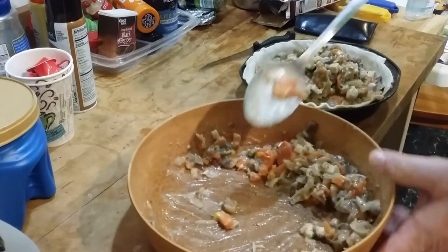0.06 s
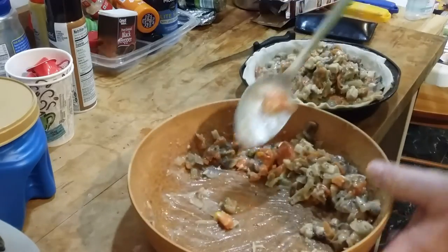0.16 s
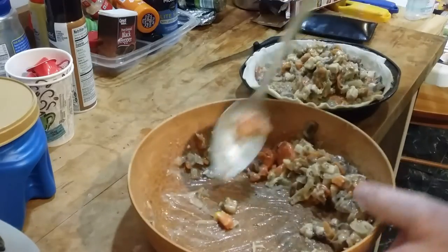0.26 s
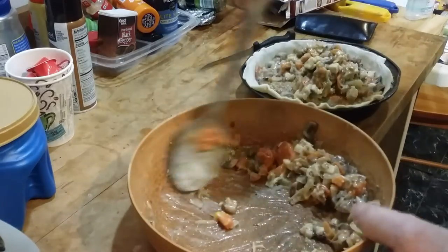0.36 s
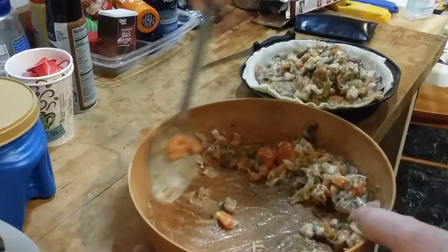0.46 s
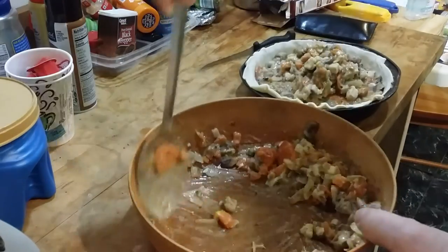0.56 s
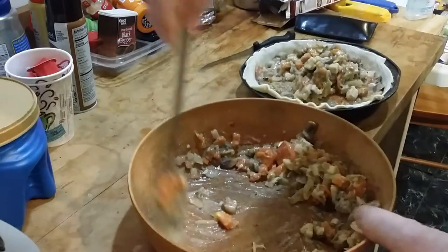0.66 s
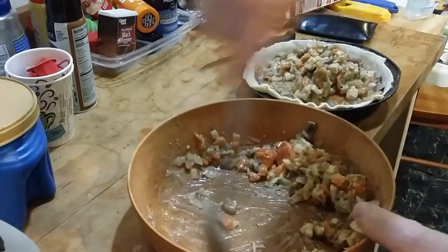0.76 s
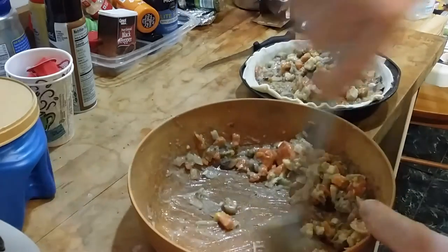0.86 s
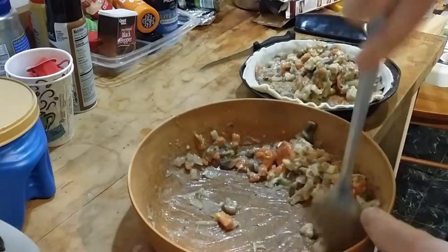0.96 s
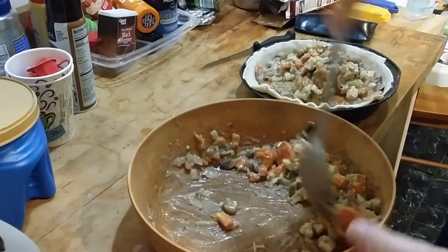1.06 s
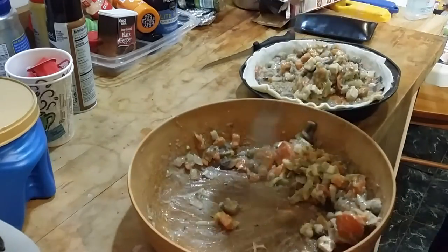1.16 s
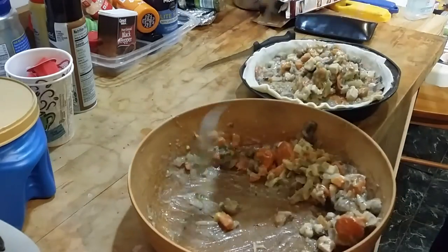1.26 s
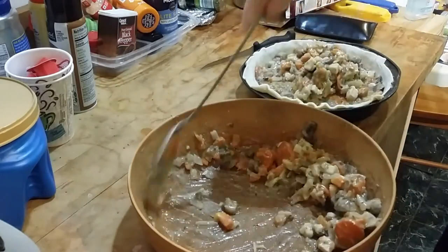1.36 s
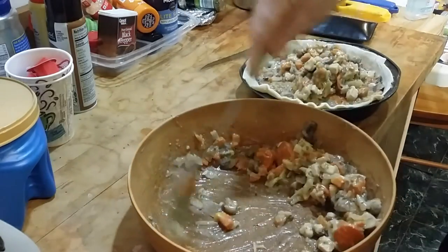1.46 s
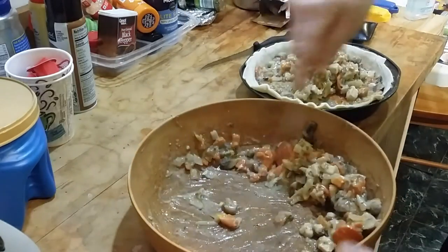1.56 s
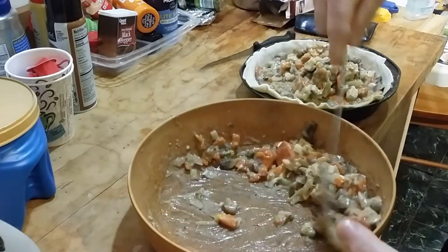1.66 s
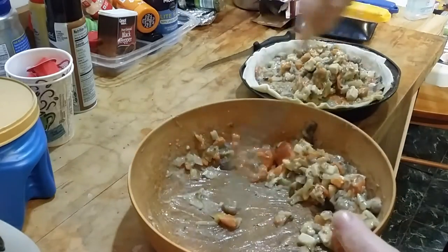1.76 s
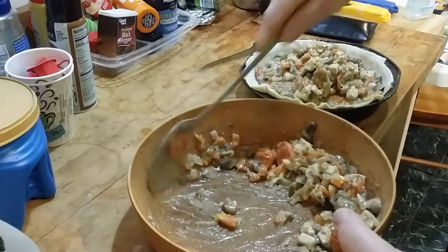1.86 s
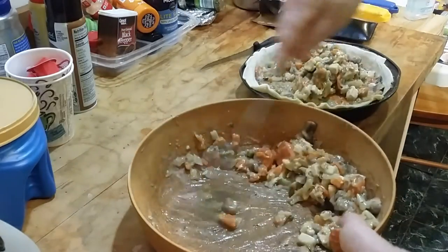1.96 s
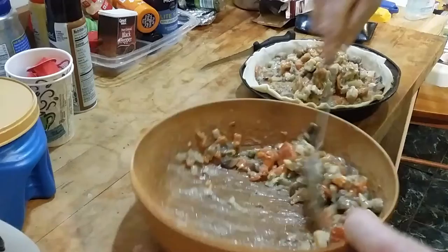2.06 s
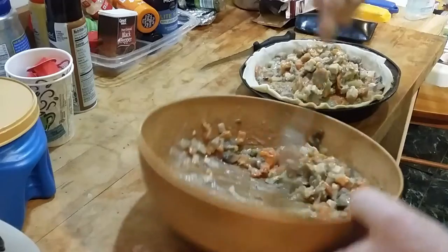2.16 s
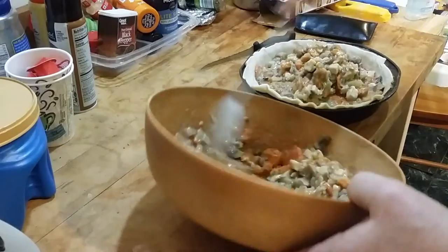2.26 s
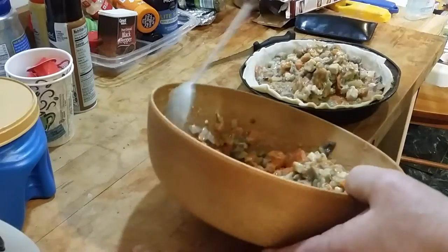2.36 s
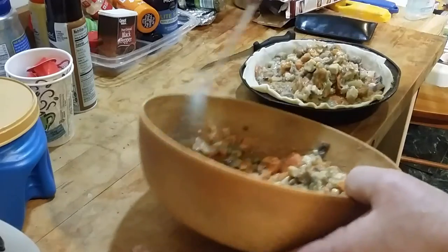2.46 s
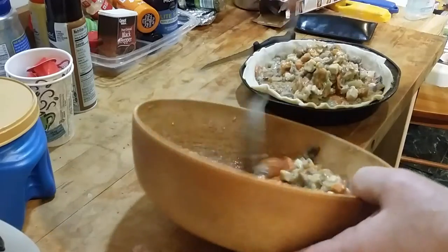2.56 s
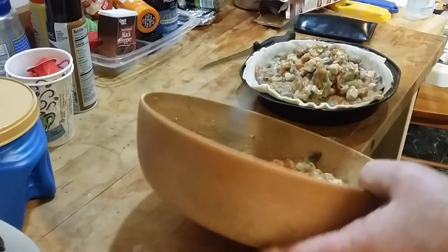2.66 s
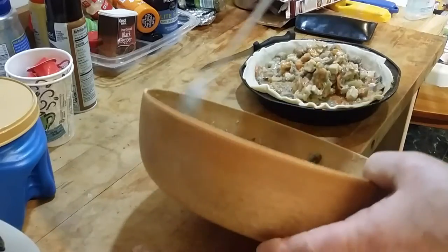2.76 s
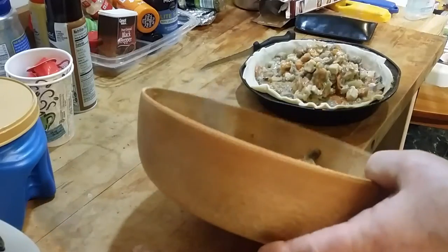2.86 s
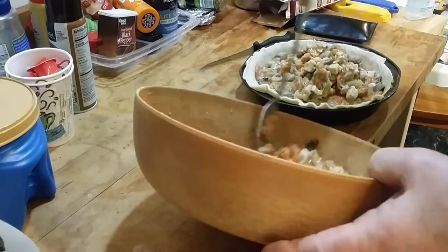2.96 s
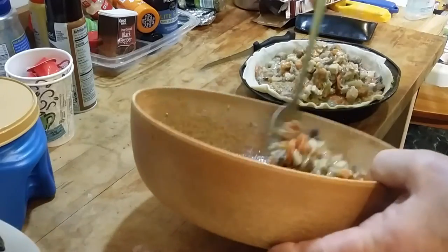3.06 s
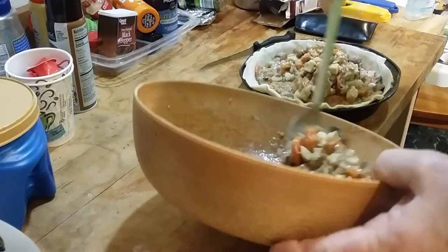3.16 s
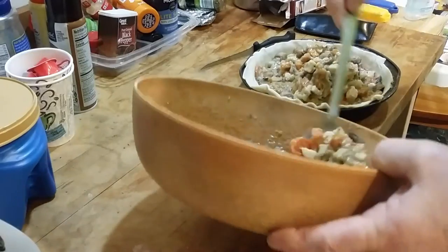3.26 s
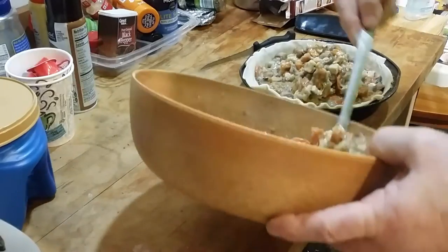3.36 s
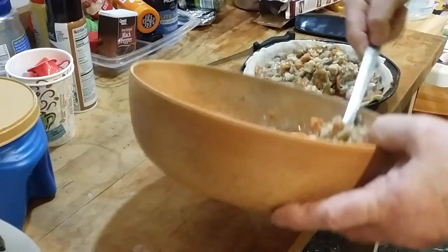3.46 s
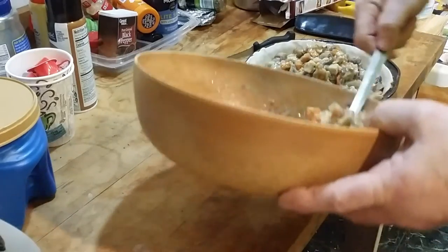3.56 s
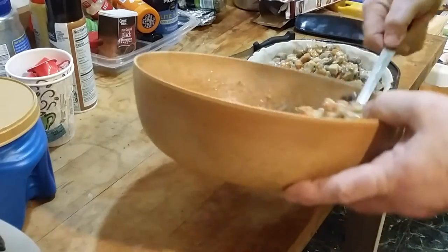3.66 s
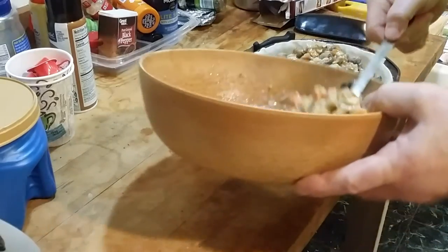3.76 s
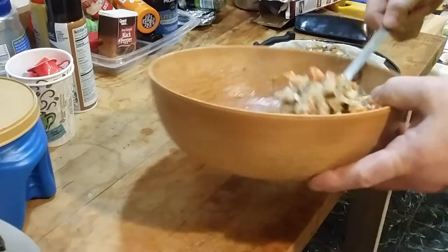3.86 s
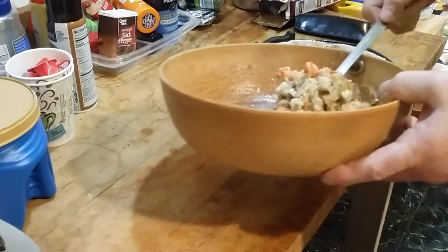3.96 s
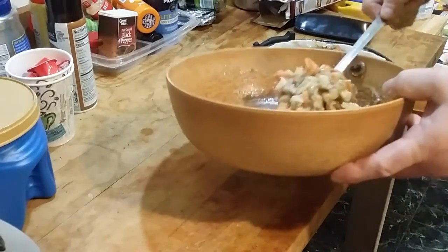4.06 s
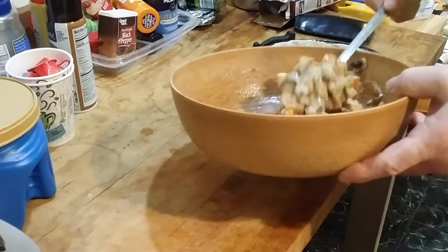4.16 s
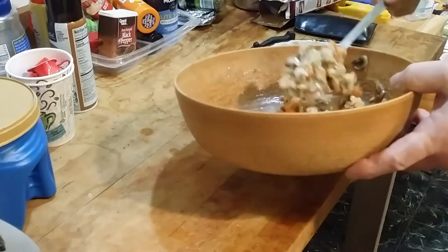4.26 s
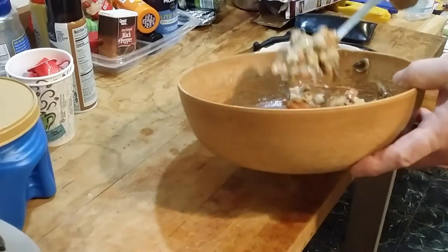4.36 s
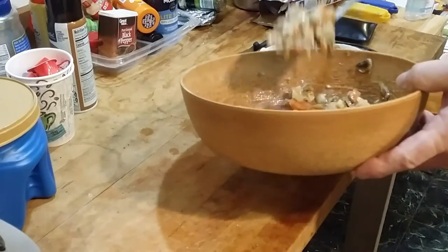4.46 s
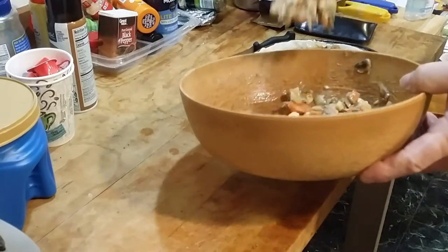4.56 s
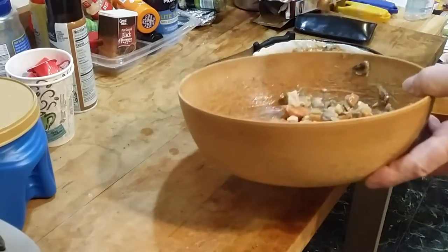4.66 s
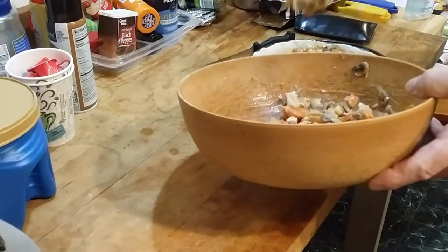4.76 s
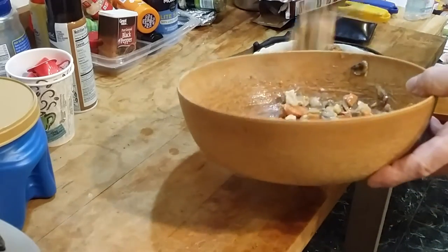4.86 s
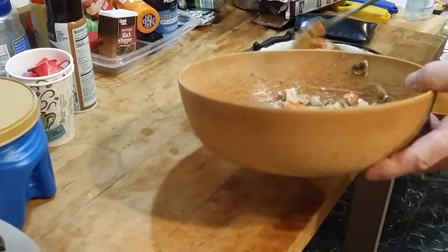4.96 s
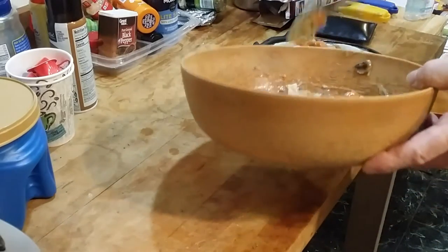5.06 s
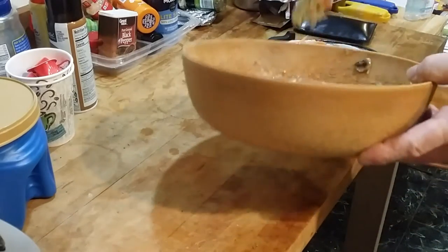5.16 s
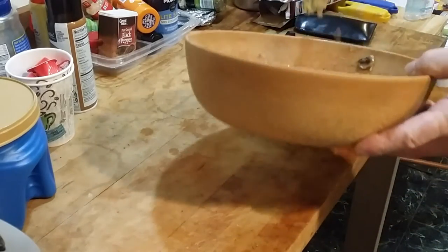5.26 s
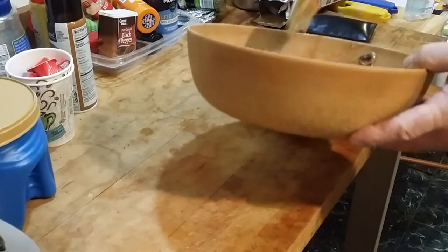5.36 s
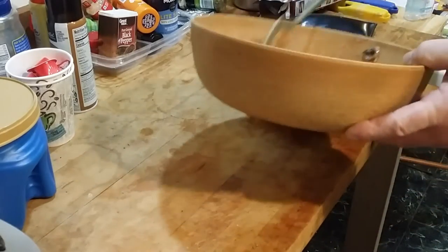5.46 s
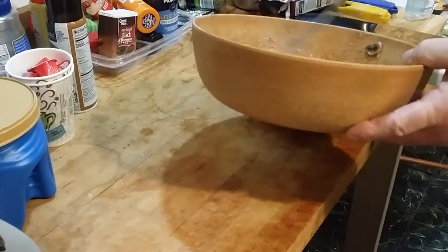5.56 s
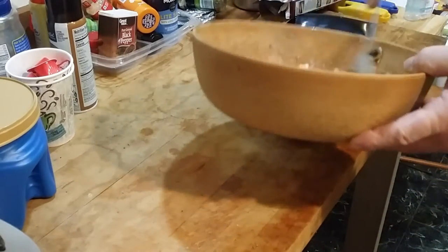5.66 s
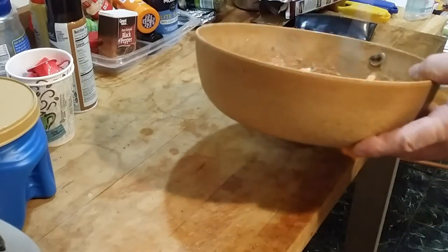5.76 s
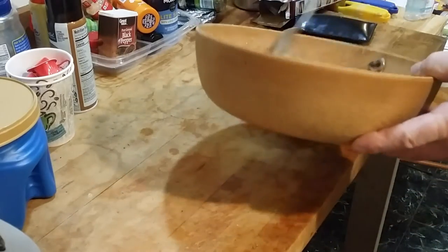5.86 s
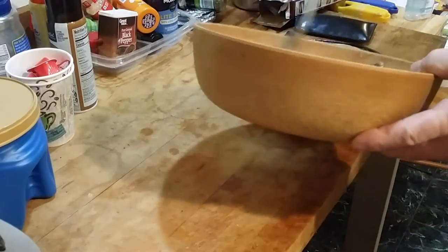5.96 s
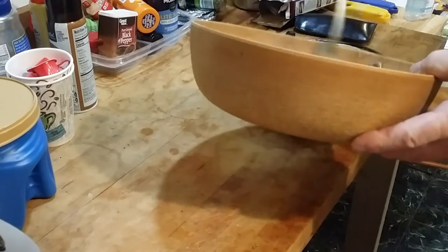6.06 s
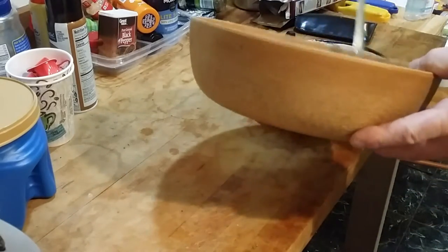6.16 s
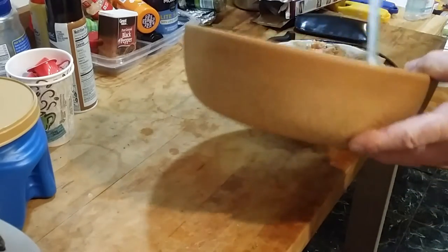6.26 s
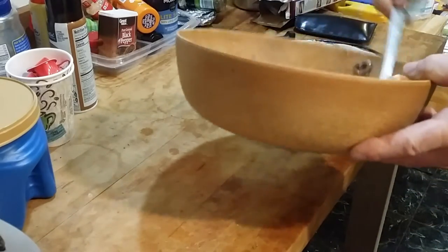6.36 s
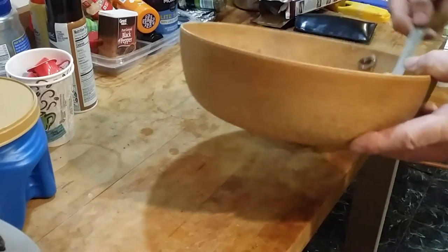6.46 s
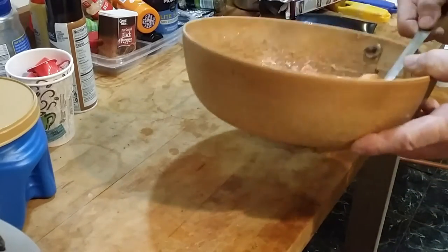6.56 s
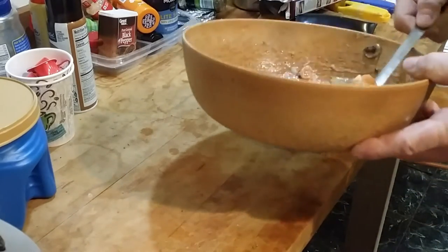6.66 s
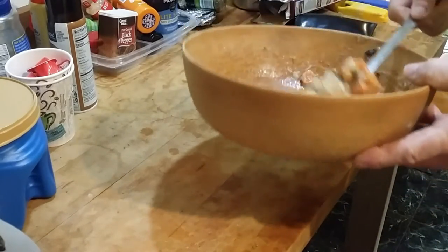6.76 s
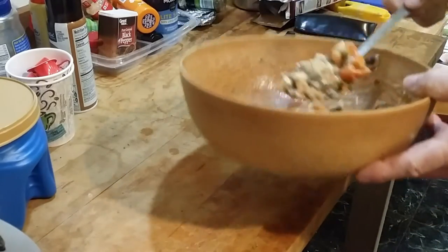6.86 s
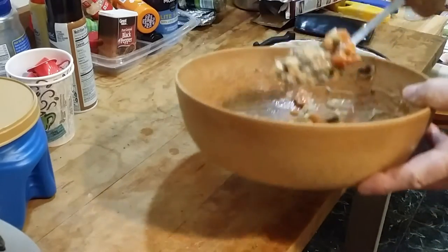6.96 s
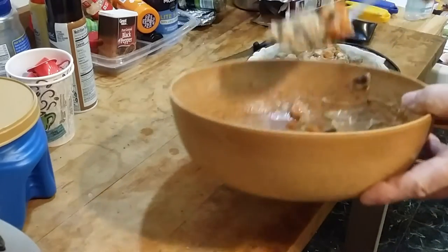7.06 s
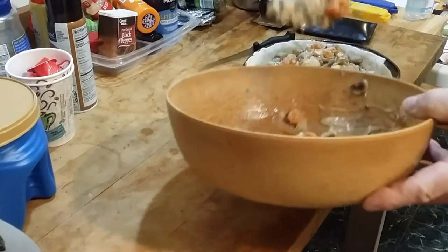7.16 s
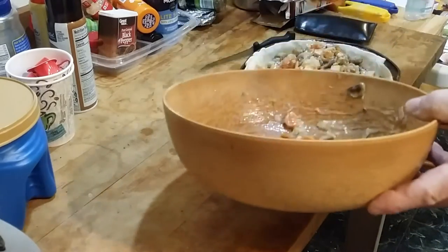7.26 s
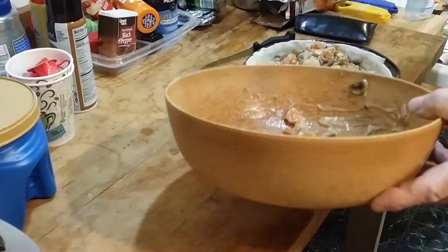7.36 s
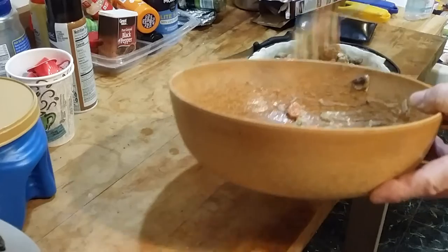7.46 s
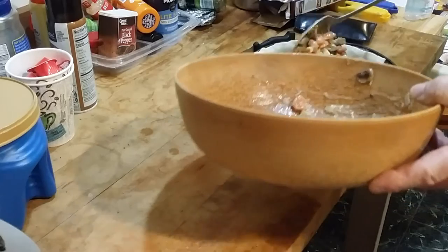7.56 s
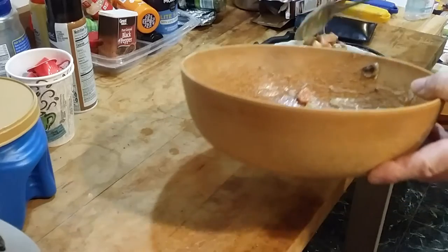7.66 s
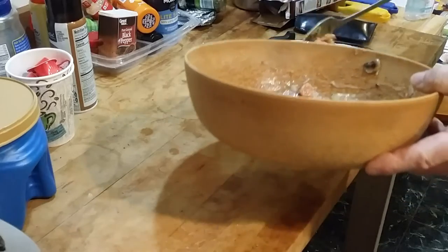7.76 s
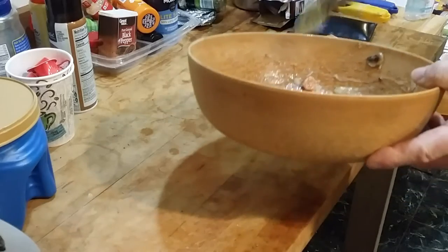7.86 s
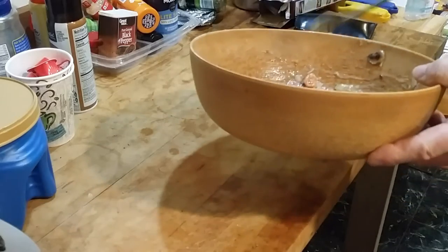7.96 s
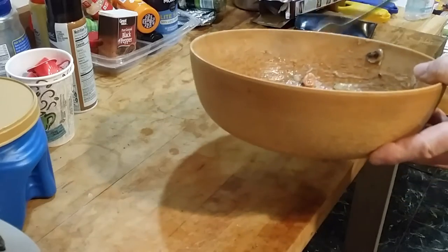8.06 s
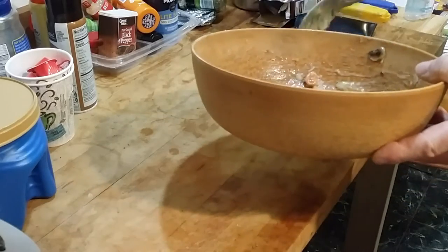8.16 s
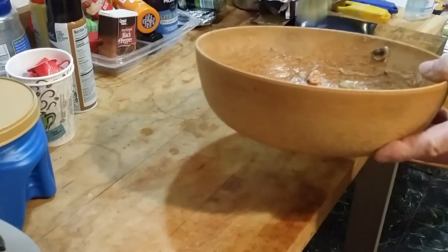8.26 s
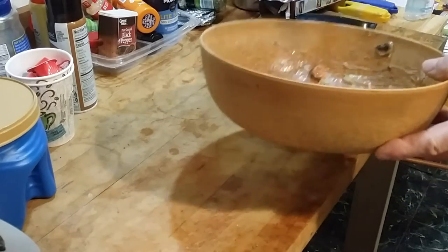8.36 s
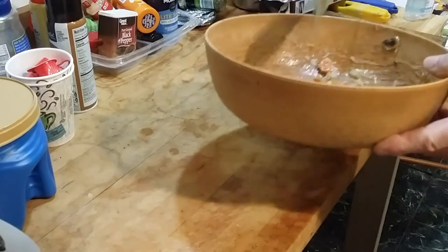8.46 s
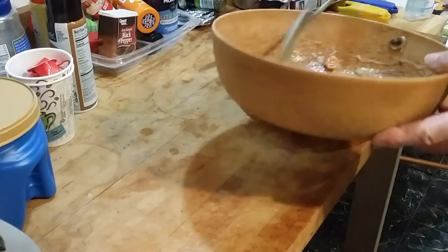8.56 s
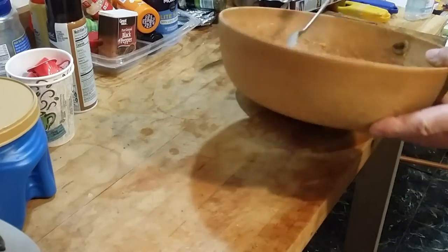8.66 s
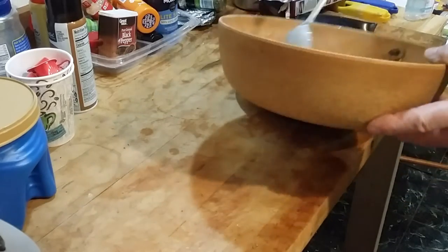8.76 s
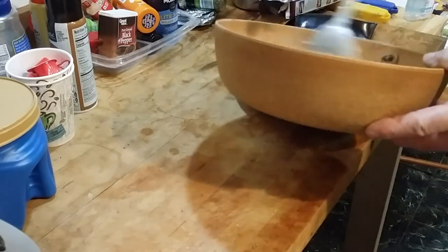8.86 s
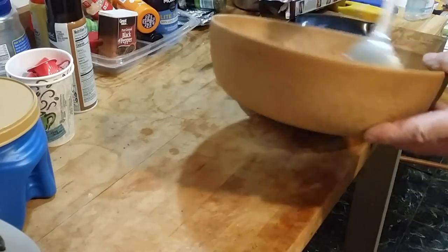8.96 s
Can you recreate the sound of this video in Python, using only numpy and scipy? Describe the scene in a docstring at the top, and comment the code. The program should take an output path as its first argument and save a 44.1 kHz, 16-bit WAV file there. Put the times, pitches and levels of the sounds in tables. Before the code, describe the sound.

A metal spoon knocks and scrapes along a wooden bowl in bursts, with wet filling ticking and smacking as it drops into a dish nearby.

```python
"""A metal spoon knocks on and scrapes along a wooden bowl held in one hand, close to the microphone: uneven
grains and sharp cracks drive banks of resonances, the bright ones near 7 kHz being the microphone's own.
Brief narrow rings of noise lie within the scrape and knocks, and the bowl hums under slow strokes. Filtered
noise puffs make the wet filling tick and smack as it is lifted and dropped into a dish. Low modes boom when
the bowl bumps the counter. A small kitchen adds a dense tail; appliance hum and air noise behind sink while
the spoon is busy and swell again in the pauses."""
import sys
import numpy as np
from scipy import signal
from scipy.fft import rfft, irfft
from scipy.io import wavfile
from scipy.ndimage import uniform_filter1d

SR = 44100
rng = np.random.default_rng(int(sys.argv[2]) if len(sys.argv) > 2 else 0)


def inscribe(sig):
    """Save sig as 16-bit PCM at rate SR to the path in sys.argv[1].

    A 1-D sig is mono; a 2-D sig holds one channel per row.
    Samples are clipped to [-1, 1] before scaling.
    """
    pcm = np.round(np.clip(np.atleast_2d(sig).T, -1, 1) * 32767)
    wavfile.write(sys.argv[1], SR, pcm.astype(np.int16))


N = 397341   # length in samples, about 9 s

# Strokes of the spoon, each a list of pushes; the stroke lands where its first push starts. Columns:
# start_s, length_s, edge_db, change_db (over the push), wall_db and body_db (against the edge),
# wall_hz and body_hz (favoured pitches)
SPOON_STROKES = [
    [(0.075, 0.081, -25.5, -1.5, -5.5, 3, 1660, 387)],
    [(.447, 0.033, -10.5, -7, -5, -12.5, 2930, 640), (.534, 0.0051, -10.5, -2.5, -10, -22.5, 3400, 534),
     (.626, 0.18, -15, 2.5, -11, -24, 3420, 450), (.885, .01, -19, -7, -8, -10.5, 3100, 470),
     (.92, 0.035, -11.5, -5, -11, -19.5, 3040, 630)],
    [(1.097, 0.013, -37, -16, -24, -32, 2920, 465)],
    [(1.443, .04, -20, 5, -4.5, -12, 3350, 442), (1.572, 0.012, -15, 4, -2, -9, 2010, 790),
     (1.622, 0.061, -8.5, -5, -6.5, -17.5, 2700, 800)],
    [(1.925, 0.091, -11, -10.5, -10, -22.5, 3520, 625), (2.048, 0.053, -10.5, 0, -5, -13, 2100, 900)],
    [(2.416, 0.092, -20.5, -13, -5.5, -13, 3000, 446), (2.537, 0.042, -13.5, 0, -8, -26.5, 3220, 473),
     (2.615, 0.0098, -28, -1, -1, -21, 3200, 603)],
    [(2.845, 0.023, -15, -25, -7, -7, 3360, 457), (2.93, 0.058, -11, -3, -8.5, -20.5, 3100, 685),
     (3.05, 0.084, -35.5, -6, -2, 4.5, 2330, 590)],
    [(3.119, 0.067, -25.5, -3.5, -2.5, -9, 3340, 700), (3.2, 0.19, -26.5, -10, -4.5, 0.5, 2200, 626),
     (3.42, 0.078, -34, -6, -8, 4, 1670, 527)],
    [(3.678, 0.0075, -22, -3.5, -1, -3.5, 1500, 1110), (3.8, .006, -39.5, 3, -12, -19, 3450, 715)],
    [(5.55, 0.048, -21.5, 1, 5.5, 1.5, 2080, 534), (5.63, 0.024, -12.5, 0, 0.5, -12.5, 2940, 630),
     (5.685, 0.034, -17, -4.5, 0, -4, 2600, 590)],
    [(5.952, 0.0067, -18.5, -12, 1, 5, 1990, 550), (6.011, 0.065, -26.5, 2, 1, -7, 1930, 536),
     (6.097, .04, -18, -3.5, -8, -24, 3430, 930), (6.155, 0.2, -25.5, -22, -2.5, -5, 2100, 750)],
    [(6.356, 0.022, -34, -1, -6, -4, 2840, 710)],
    [(6.432, .006, -28.5, -1.5, 0.5, -9, 1700, 850)],
    [(6.549, 0.029, -32.5, -9, -6, -12, 3200, 1020)],
    [(8.694, 0.091, -17.5, -15, 2.5, 2.5, 2380, 790), (8.858, 0.046, -16, 1, -5, -12, 3100, 385),
     (8.944, 0.071, -7, -11.5, -9.5, -18, 3170, 592)],
]


def from_db(db):
    """Decibels to gain."""
    return 10 ** (np.asarray(db) / 20)


def rms_one(x):
    """Scale to unit rms."""
    return x / np.sqrt(np.mean(x ** 2) + 1e-20)


def drift(rate_hz):
    """Slow random wander of unit rms: low-passed noise on a coarse time grid, joined by lines."""
    grid_hz = 400
    knots = rng.standard_normal(int(N / SR * grid_hz) + 2)
    smooth = signal.lfilter([1], [1, -np.exp(-2 * np.pi * rate_hz / grid_hz)], knots)
    return np.interp(np.arange(N) / SR * grid_hz, np.arange(len(knots)), rms_one(smooth))


def plateau(start_s, length_s, change_db, rise_db_per_s, fall_db_per_s):
    """Level in dB of a sound that builds up to its start, drifts while it lasts and dies after."""
    t = np.arange(N) / SR - start_s
    build = rise_db_per_s * np.minimum(t, 0)
    change = change_db * np.clip(t / length_s, 0, 1)
    fall = fall_db_per_s * np.maximum(t - length_s, 0)
    return build + change - fall


def add(track, start_s, burst):
    """Lay a burst on the track at its start time."""
    at = round(start_s * SR)
    track[at:at + len(burst)] += burst[:N - at]


def dying_noise(t60_s, rise_s):
    """Half a second of noise that rises quickly and dies away, 60 dB per t60."""
    t = np.arange(SR // 2) / SR
    return rng.standard_normal(len(t)) * from_db(-60 * t / t60_s) * (1 - np.exp(-t / rise_s))


def resonate(x, hz, width_hz):
    """One two-pole resonance, gain about 1 on top."""
    r = np.exp(-np.pi * width_hz / SR)
    feedback = [1, -2 * r * np.cos(2 * np.pi * hz / SR), r * r]
    return signal.lfilter([(1 - r * r) / 2, 0, (r * r - 1) / 2], feedback, x)


def puff(hz, width_share, t60_s, rise_s):
    """A noise puff of peak 1, twice through a resonance whose width is a share of its pitch."""
    width_hz = hz * width_share
    rung = resonate(resonate(dying_noise(t60_s, rise_s), hz, width_hz), hz, width_hz)
    return rung / np.abs(rung).max()


def resonances(force, table, favoured_hz, reach_octaves, wander_db):
    """Parallel resonances, driven hardest near the favoured pitch; drives wander as the contact moves."""
    out, power = 0, 0
    for k, (hz, width_hz, db) in enumerate(table):
        near = 0.6 + np.exp(-(np.log2(hz / favoured_hz) / reach_octaves) ** 2)
        drive = from_db(db + wander_db * drift(7)) * near
        out = out + (-1) ** k * resonate(force * drive, hz, width_hz)
        power = power + drive ** 2 * np.pi * width_hz / SR   # share of white noise let through
    # the changing drives alter the colour, while the overall level is evened out
    return out / np.sqrt(uniform_filter1d(power, size=441))


def background():
    """Patchy air noise and a wavering hum near mains multiples; both sink in the busy spells."""
    # Colour of the air noise at the microphone, shape only: pitch_hz, level_db (per Hz)
    air_colour = np.array([(15, -56), (30, -21.5), (110, -10), (150, -12.5), (190, -2), (310, -3.5),
                           (440, -4), (770, -7.5), (1290, -16.5), (3310, -26), (5680, -21), (7240, -10.5),
                           (9000, -24.5), (11500, -32), (15800, -34)])
    # Appliance hum: pitch_hz, level_db (against the air noise, before the raise below)
    hum_lines = [(60, -27.5), (119, -17), (181, -20)]
    # Spells in which the spoon is busy: start_s, length_s, depth_db
    busy_spells = [(0.443, 0.92, 16), (1.447, 0.54, 10), (1.915, 0.48, 15), (2.404, 0.88, 16.5),
                   (3.673, .1, 11.5), (5.545, 1.294, 17.5), (8.681, .4, 5)]
    calm_db, hum_raise_db = -35.5, 4.0
    sink_db_per_s, recover_db_per_s = 1401, 23

    hz = np.maximum(np.fft.rfftfreq(N, 1 / SR), 1)
    colour = from_db(np.interp(np.log(hz), np.log(air_colour[:, 0]), air_colour[:, 1]))
    air = rms_one(irfft(rfft(rng.standard_normal(N)) * colour, N))
    air = air * from_db(0.23 * drift(8))

    t = np.arange(N) / SR
    hum = 0
    for line_hz, db in hum_lines:
        strength = from_db(db + hum_raise_db + 1.9 * drift(3.7))
        hum = hum + strength * np.sin(2 * np.pi * line_hz * t + 0.99 * drift(5.7))

    sinks_db = [depth_db + plateau(start_s, length_s, 0, sink_db_per_s, recover_db_per_s)
                for start_s, length_s, depth_db in busy_spells]
    sunk_db = np.max(sinks_db, axis=0).clip(0)   # the deepest sink counts
    return from_db(calm_db - sunk_db) * (air + hum)


def bumps():
    """The bowl bumps or shifts; the counter booms on its low modes under a duller knock."""
    # Bumps on the counter: start_s, boom_db and knock_db (before mode levels and raise), knock_hz,
    # t60_s (fade of the knock's noise)
    thuds = [(0.0, -25, -18.5, 244, 0.08), (0.083, -17.5, -13, 190, 0.14), (0.129, -20.5, -23, 205, 0.2),
             (0.458, -26, -26, 202, 0.13), (0.743, -41.5, -33.5, 178, 0.34), (1.451, -37.5, -28, 272, 0.39),
             (1.929, -34, -30, 273, 0.17), (2.42, -58, -40, 247, 0.85), (2.845, -49, -40.5, 225, 0.23),
             (3.368, -42, -41, 151, 0.19), (7.547, -45, -38, 296, 0.16), (8.701, -58.5, -25.5, 266, 0.37)]
    # Low modes of the counter: pitch_hz, level_db
    counter_modes = [(60, -6), (119, 0.5), (187, 1.5)]
    knock_raise_db, boom_stretch = 7.5, 1.97   # the boom lasts longer than the knock

    out, t = np.zeros(N), np.arange(SR // 2) / SR
    boom = sum(from_db(db) * np.sin(2 * np.pi * hz * t) for hz, db in counter_modes)
    for start_s, boom_db, knock_db, hz, t60_s in thuds:
        dying = from_db(boom_db - 60 * t / (boom_stretch * t60_s)) * (1 - np.exp(-t / 0.012))
        knock = from_db(knock_db + knock_raise_db) * puff(hz, 1.4, t60_s, rise_s=0.018)
        add(out, start_s, dying * boom + knock)
    return out


def rubbing():
    """Levels of edge, wall and body in dB: the strongest push counts; silence before a landing."""
    press_db_per_s, lift_db_per_s = 338, 312   # how fast a push builds and lets go at the edge
    wall_follows, body_follows = 0.83, 0.76   # share of the edge's swing in dB
    levels = np.full((3, N), -120.)
    for pushes in SPOON_STROKES:
        landed = round(pushes[0][0] * SR)
        span = slice(landed, landed + SR)   # a stroke is heard for a second at most
        for start_s, length_s, db, change_db, wall_db, body_db, _, _ in pushes:
            swing = plateau(start_s, length_s, change_db, press_db_per_s, lift_db_per_s)[span]
            push = db + np.array([swing, wall_db + wall_follows * swing, body_db + body_follows * swing])
            levels[:, span] = np.maximum(levels[:, span], push)
    return levels


def spoon():
    """Wood grain catches the edge as dense uneven clicks; they and the knocks drive the same resonances."""
    # Spoon meets wood, force before the resonances: start_s, edge_db, wall_db, body_db
    knocks = [(0.0769, -11, -11, -4.5), (0.4433, 1, -5, -26), (0.5403, -21, -47, -46),
              (1.4402, -9.5, -11, -19.5), (1.922, 1.5, -48, -23), (2.0185, -12, -31, -31),
              (2.4133, -9.5, -20.5, -41), (2.578, -3.5, -51, -59), (2.8413, -4.5, -12, -34),
              (3.1185, -14.5, -33, -29), (3.68, -35, -41, -33), (3.981, -18, -15.5, -22.5),
              (5.548, -1, 0.5, -4), (5.6462, -7.5, -5.5, -25), (5.9489, -12, -8.5, -36.5),
              (6.066, -4.5, -53.5, -33), (6.1493, -20, -14.5, -25.5), (6.4344, -11, -17.5, -36),
              (6.5452, -33, -26.5, -29), (8.6915, -10, -2, -10.5)]
    # Resonances heard in the scrape; the bright ones near 7 kHz belong to the microphone.
    # Each table: pitch_hz, width_hz, drive_db (relative)
    edge_band = [(4800, 720, -16.5), (5307, 226, -7.5), (5660, 580, -9), (6285, 270, -6), (6586, 79, -0.5),
                 (6988, 110, 1.5), (7350, 220, 0), (7390, 130, 1), (7550, 244, -4.5), (8010, 128, -3.5),
                 (8114, 215, -6.5), (9300, 2500, -19), (12300, 3400, -42)]
    wall_band = [(1454, 227, -3), (1753, 50, 0.6), (1877, 55, -2.6), (2241, 70, -0.91), (2363, 69, -0.27),
                 (2737, 470, -2), (2887, 167, 1), (3080, 74, -2.35), (3430, 108, 1), (3643, 300, 1),
                 (3970, 680, 1), (4600, 1060, -2.4)]
    body_band = [(419, 54.4, 8.5), (487.5, 24, 4.5), (575, 81, 4.5), (708.5, 14.6, 4.5), (759, 59, 4),
                 (1037, 78, 10), (1129, 140, 7)]
    grains_per_s, grain_spread_db = 5000, 3.2

    edge_db, wall_db, body_db = rubbing()
    pushes = np.vstack(SPOON_STROKES)
    t = np.arange(N) / SR
    wall_hz, body_hz = (np.interp(t, pushes[:, 0], hz) for hz in pushes.T[-2:])   # the contact glides
    # resonances, level in dB, rattle t60 in s, favoured Hz, reach in octaves, wander in dB
    parts = [(edge_band, edge_db, 0.025, np.full(N, 7000.), 3.0, 1.6),
             (wall_band, wall_db, 0.03, wall_hz, 0.25, 1.8),
             (body_band, body_db, 0.05, body_hz, 0.3, 2.0)]
    out = np.zeros(N)
    for column, (table, level_db, rattle_t60_s, favoured_hz, reach, wander_db) in enumerate(parts, start=1):
        sizes = from_db(grain_spread_db * np.minimum(rng.exponential(1, N), 4))
        signs = rng.choice([-1, 1], N)
        grains = rms_one(sizes * signs * (rng.random(N) < grains_per_s / SR))
        force = grains * from_db(level_db + 1.33 * drift(35)) + 1e-18
        for knock in knocks:   # one sharp crack and a short rattle of contacts
            crack = from_db(knock[column]) * dying_noise(0.00073, rise_s=0.00005)
            rattle = from_db(knock[column] + 1) * dying_noise(rattle_t60_s, rise_s=0.0002)
            add(force, knock[0], crack)
            add(force, knock[0], rattle)
        out += resonances(force, table, favoured_hz, reach, wander_db)
    return out


def narrow_rings():
    """Dying noise through a narrow resonance rings briefly at one pitch; high rings die sooner."""
    # Brief narrow rings of noise within the scrape and knocks: start_s, peak_db, pitch_hz
    rings = [(.535, -22, 3390), (1.445, -20, 3570), (1.55, -20, 800), (1.925, -22, 3480), (2.42, -40, 407),
             (3.68, -28.5, 3560), (4.939, -15.5, 5270), (5.555, -17, 396), (5.601, -16, 1670),
             (6.01, -15.5, 7050), (6.265, -39, 3650), (6.359, -27.5, 7040), (6.549, -46, 1050),
             (8.695, -18, 1700), (8.695, -12.5, 3235), (8.86, -38, 3060)]
    t60_at_1khz_s, t60_slope = 0.19, -0.39   # the slope is a power of the pitch
    out = np.zeros(N)
    for start_s, db, hz in rings:
        t60_s = t60_at_1khz_s * (hz / 1000) ** t60_slope
        add(out, start_s, from_db(db) * puff(hz, 60 / hz + 0.028, t60_s, rise_s=0.004))
    return out


def chatter():
    """Even stick and slip makes one low mode sing, a little unsteadily."""
    # The bowl hums under a slow stroke: start_s, length_s, pitch_hz, rms_db (both waver a little)
    hums = [(0.639, 0.183, 475, -35), (8.865, 0.018, 385, -21.5), (8.991, .03, 384, -24)]
    fade_db_per_s = 2000
    unsteady_db = 1.5 * drift(20)
    waver = 1 + 0.008 * drift(6)
    out = 0
    for start_s, length_s, hz, db in hums:
        level_db = db + unsteady_db + plateau(start_s, length_s, 0, fade_db_per_s, fade_db_per_s)
        tone = np.sqrt(2) * np.sin(2 * np.pi * np.cumsum(hz * waver) / SR)   # unit rms
        out = out + from_db(level_db) * tone
    return out


def filling():
    """Each wet tick is a bright snap with a lower ring and a faint broad splat under it."""
    # Ticks and smacks: start_s, snap_db (peak), t60_s (of the snap's noise), ring_db (peak), ring_hz
    smacks = [(3.41, -26, .05, -39, 2920), (3.6167, -31, .094, -49, 2860), (3.74, -23, 0.093, -48, 3500),
              (3.8671, -30.5, 0.042, -47, 2290), (3.925, -21, 0.068, -50, 5700),
              (3.9632, -15, 0.054, -47, 3550), (4.0243, -24, 0.031, -32, 3110),
              (4.0826, -18, 0.1, -39, 5800), (4.104, -20.5, 0.046, -43, 5790),
              (4.204, -19, 0.049, -48, 5710), (4.2544, -46, .036, -33, 4470),
              (4.2773, -13.5, 0.048, -35, 5800), (4.285, -11, 0.035, -20, 6000),
              (4.9214, -23, 0.05, -41, 3920), (4.9358, -1.5, 0.053, -21, 5200),
              (4.962, -12.5, .073, -34, 5200), (4.9736, -12, 0.14, -22, 5350), (5, -18, 0.069, -28, 5270),
              (5.0588, -21.5, .05, -34, 5170), (5.093, -28, .041, -47, 5150),
              (5.436, -21.5, 0.029, -42.5, 5390), (7.5102, -11.5, 0.095, -12, 5840),
              (7.5173, -8, 0.13, -17, 2700), (7.5583, -24, 0.06, -22, 5700), (7.677, -27, .04, -43, 5430),
              (7.7601, -18, 0.076, -31, 5650), (7.8513, -28, .038, -31.5, 4400),
              (7.9377, -12.5, 0.13, -16.5, 4900), (8.079, -19.5, 0.081, -34, 5800),
              (8.096, -14, 0.075, -22, 5500), (8.171, -34, .04, -31, 4700),
              (8.6146, -21.5, 0.068, -29, 5360)]
    snap_hz, splat_hz, splat_db = 7110, 2200, -23   # splat level against the snap
    out = np.zeros(N)
    for start_s, db, t60_s, ring_db, ring_hz in smacks:
        snap = puff(snap_hz, 0.3, t60_s, rise_s=0.00043)
        splat = from_db(splat_db) * puff(splat_hz, 3.0, 1.3 * t60_s, rise_s=0.0013)
        ring = from_db(ring_db) * puff(ring_hz, 0.52, 1.5 * t60_s, rise_s=0.0015)
        add(out, start_s, from_db(db) * (snap + splat) + ring)
    return out


def kitchen(x):
    """Reflections of the small room as a dense dying tail, slightly dulled."""
    t60_s, wall_cut_hz = 0.27, 11100
    tail = dying_noise(t60_s, rise_s=0.011)
    tail = signal.sosfilt(signal.butter(1, wall_cut_hz, fs=SR, output="sos"), tail)
    return signal.fftconvolve(x, tail / np.sqrt(np.sum(tail ** 2)))[:N]


def scene():
    """Spoon, filling and bowl near the microphone, their reflections, and the background."""
    kitchen_db = -10.5
    near = spoon() + chatter() + narrow_rings() + filling() + bumps()
    return (near + from_db(kitchen_db) * kitchen(near) + background())[None]


def record(dry):
    """The loudest peaks are flattened and the top is cut."""
    cutoff_hz = 16200
    low_pass = signal.cheby2(16, 80, cutoff_hz, fs=SR, output="sos")
    return signal.sosfilt(low_pass, np.clip(dry, -1.05, 1.05))


dry = scene()
out = record(dry)
inscribe(out)
```